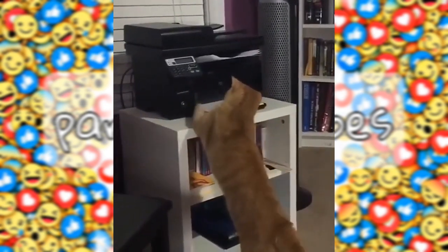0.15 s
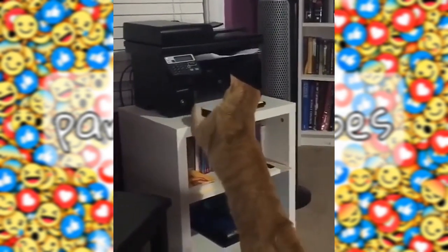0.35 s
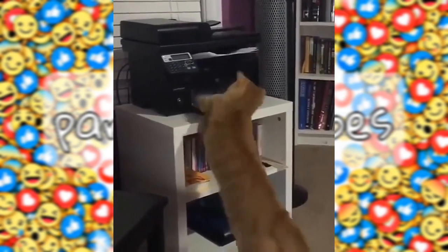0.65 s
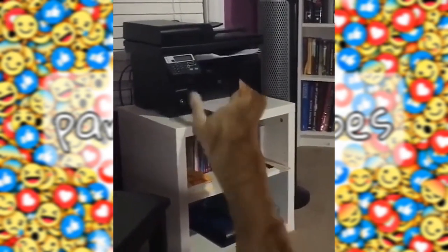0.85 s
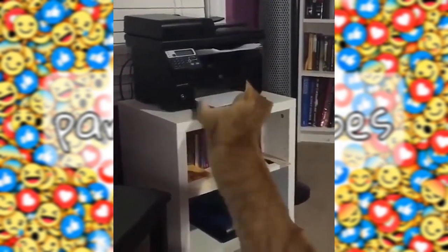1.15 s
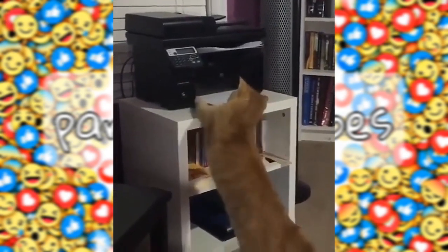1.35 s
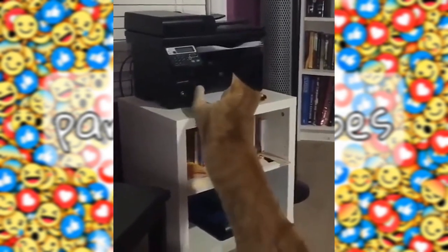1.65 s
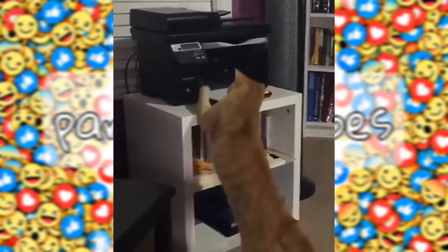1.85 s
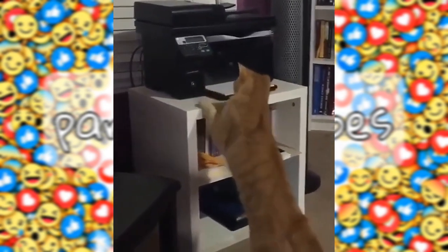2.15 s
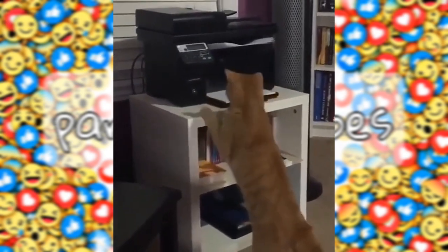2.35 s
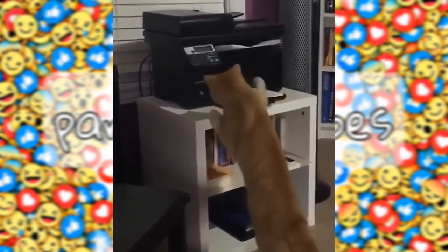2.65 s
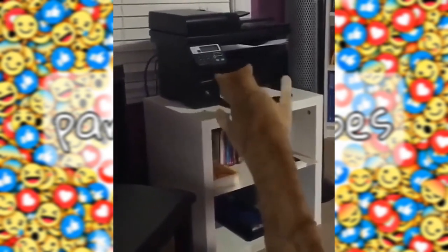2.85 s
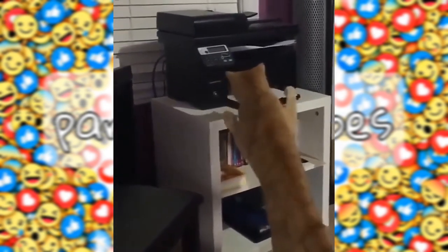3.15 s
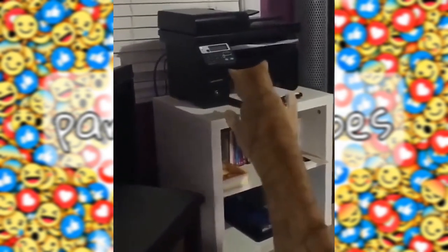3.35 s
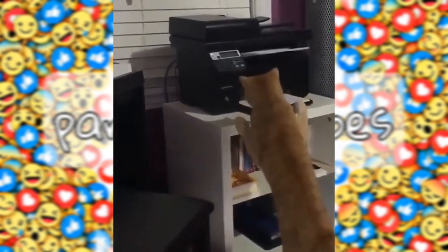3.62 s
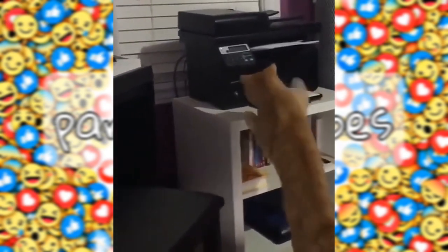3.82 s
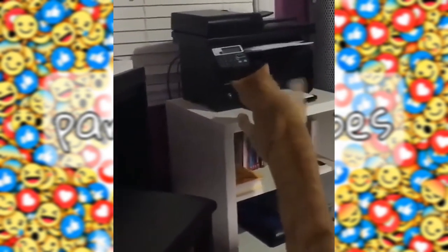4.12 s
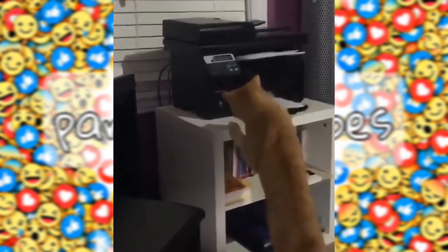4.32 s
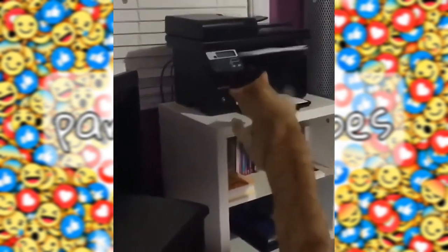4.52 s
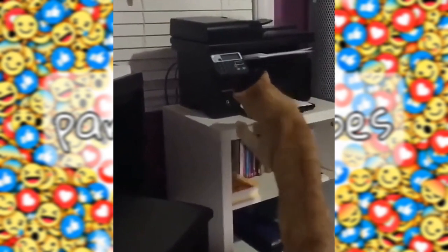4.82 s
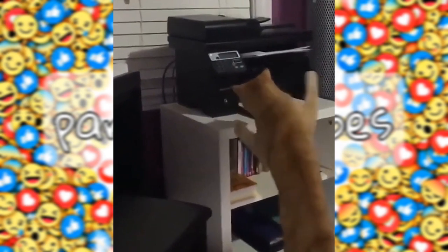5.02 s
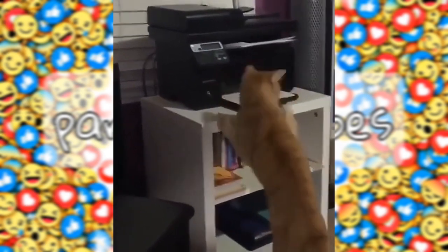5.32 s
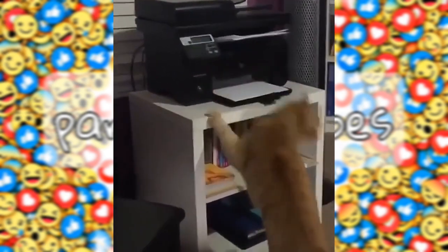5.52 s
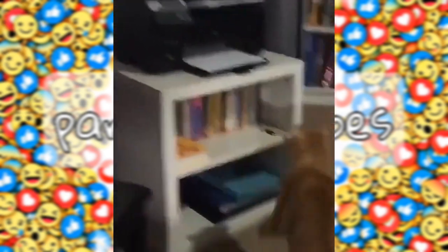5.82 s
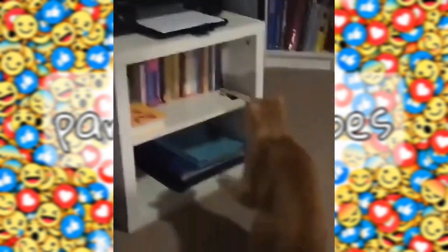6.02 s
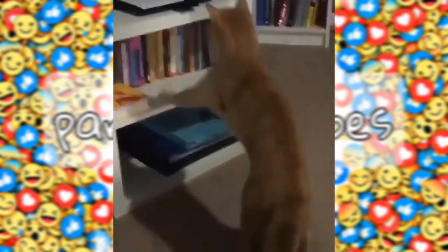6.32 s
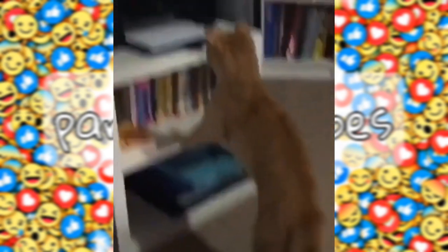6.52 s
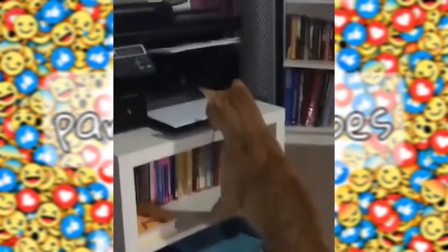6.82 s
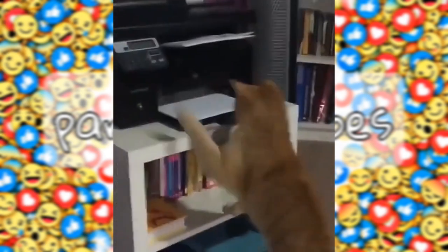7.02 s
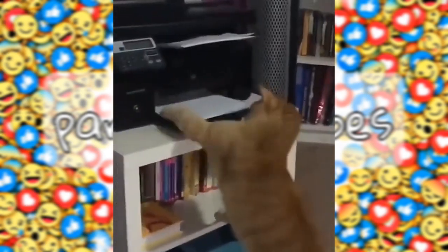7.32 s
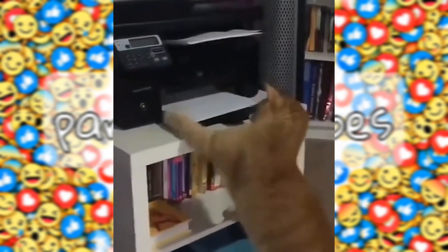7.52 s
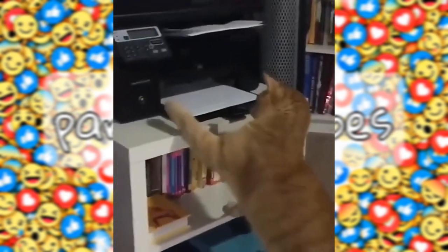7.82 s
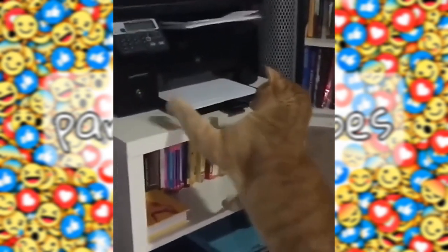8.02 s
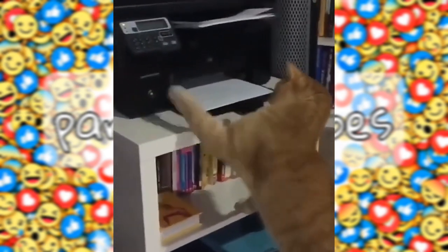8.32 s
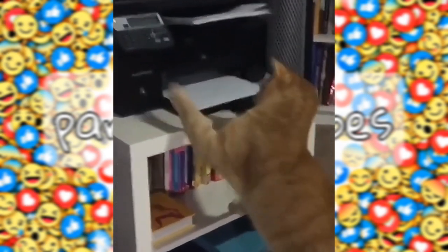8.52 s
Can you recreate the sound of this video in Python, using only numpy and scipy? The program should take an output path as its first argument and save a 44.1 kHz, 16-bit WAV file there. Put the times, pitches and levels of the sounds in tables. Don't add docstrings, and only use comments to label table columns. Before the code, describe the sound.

In a small quiet room, a phone about two metres away picks up a cat batting a printer tray. Short rattling plastic knocks ring the casing and boom in the hollow shelf, mixed with padded thuds and paper scuffs. Blows come in uneven clusters, pause mid-way, then return harder and more papery. A low fan hum and faint hiss continue underneath.

```python
import sys
import numpy as np
from scipy import signal
from scipy.fft import rfft, irfft, next_fast_len
from scipy.io import wavfile
from scipy.ndimage import uniform_filter1d

SR = 44100
rng = np.random.default_rng(int(sys.argv[2]) if len(sys.argv) > 2 else 0)


def wav_out(sig):
    wavfile.write(sys.argv[1], SR, np.round(np.clip(np.atleast_2d(sig).T, -1, 1) * 32767).astype(np.int16))


def magnitude_from_level(level_db):
    exponent = np.asarray(level_db, float) / 20
    return 10 ** exponent


N = 381899
LOW_HZ, HIGH_HZ = 520, 3800


def unit(x):
    return x / np.sqrt(np.mean(x ** 2))


def shape(x, gain):
    size = next_fast_len(len(x) + SR)
    f_hz = np.arange(size // 2 + 1) * SR / size + 1
    return irfft(rfft(x, size) * gain(f_hz), size)[:len(x)]


def colour(points):
    hz, db = np.transpose(points)
    return lambda f: magnitude_from_level(np.interp(np.log(f), np.log(hz), db))


def modes(table):
    def response(f):
        total = 0
        for k, (hz, width_hz, db) in enumerate(table):
            damping = 1j * f * width_hz
            total = total + (-1) ** k * magnitude_from_level(db) * damping / (hz ** 2 - f ** 2 + damping)
        return total
    return response


def split(x):
    low = signal.sosfilt(signal.butter(2, LOW_HZ, fs=SR, output="sos"), x)
    middle = signal.sosfilt(signal.butter(2, [LOW_HZ, HIGH_HZ], "band", fs=SR, output="sos"), x)
    high = signal.sosfilt(signal.butter(2, HIGH_HZ, "high", fs=SR, output="sos"), x)
    return low, -middle, high


def walk(rate_hz):
    k = int(SR / rate_hz)
    held = np.repeat(rng.standard_normal(N // k + 1), k)
    return uniform_filter1d(uniform_filter1d(held, k), k)[:N]


def patchy(x, spread_db, slow=9, wide=7):
    spec = signal.stft(x, nperseg=512)[2]
    field = uniform_filter1d(rng.standard_normal(spec.shape), slow, axis=1)
    field = uniform_filter1d(field, wide, axis=0)
    return signal.istft(spec * magnitude_from_level(spread_db * unit(field)), nperseg=512)[1][:N]


def swell(peak_s, db, rise_db_per_s, fade_db_per_s):
    age_s = np.arange(N) / SR - peak_s
    return magnitude_from_level(db + np.where(age_s < 0, rise_db_per_s, -fade_db_per_s) * age_s)


def fan():
    # [f/Hz, density/dB per Hz]
    air_colour = [(18, -71), (30, -14), (174, -24), (203, 4), (285, -13), (308, 1), (341, -15.5),
                  (543, -12.5), (722, -14.5), (780, -9), (843, -14), (1700, -13.5), (7600, -38.5),
                  (13400, -39.5), (14500, -80)]
    # [f/Hz, width/Hz, level/dB]
    hum = [(125.6, 21, -5.5), (214.6, 7.2, -5.5), (261, 15, -1), (301, 3.4, -12.5), (1255, 120, -16.5),
           (1560, 68, -10.5), (1725, 125, -18.5), (2750, 170, -35)]
    # [f/Hz, level/dB]
    motor = [(769.8, -70), (1130, -76.5), (1540, -76.5), (1755, -73.5), (3079, -83)]
    hum_db, hiss_db, rustle_db = -63, -63.5, -73
    fur = swell(peak_s=6.458, db=-66.5, rise_db_per_s=10, fade_db_per_s=50)
    levels = magnitude_from_level(hum_db), magnitude_from_level(hiss_db), np.hypot(magnitude_from_level(rustle_db), fur)
    air = shape(rng.standard_normal(N), colour(air_colour))
    resonance = shape(rng.standard_normal(N), modes(hum))
    duct = unit(air) + magnitude_from_level(-4.5) * unit(resonance)
    out = 0
    for part, gain, flicker_db in zip(split(patchy(duct, 2.4, slow=4)), levels, (2.0, 1.2, 1.3)):
        out = out + unit(part) * gain * magnitude_from_level(flicker_db * walk(12))
    for hz, db in motor:
        gain = np.sqrt(2) * magnitude_from_level(db + 1.0 * walk(18))
        wavering_hz = hz * (1 + 0.00195 * walk(4.4))
        out = out + gain * np.sin(2 * np.pi * np.cumsum(wavering_hz) / SR)
    return out


def blows():
    # [t/s, peak/dB, paper slap/dB re casing, struck panel f/Hz]
    drops = [(0.001, -16.5, -9.5, 980), (1.002, -30.5, 5, 1350), (1.395, -18.5, 2, 1640),
             (1.426, -22.5, -6, 1970), (1.629, -26.5, -0.5, 2170), (1.999, -30, -18, 2000),
             (2.988, -26.5, -11, 1030), (3.975, -32, -6.5, 1640), (4.803, -21.5, -3, 1370),
             (7.145, -30.5, -5.5, 1650), (7.748, -13.5, 1, 1880), (8.636, -14.5, -3.5, 2100)]
    # [s, dB, dB, Hz]
    bats = [(0.02, -17, -11.5, 2750), (0.756, -30.5, -9.5, 1030), (0.853, -14, -11.5, 1600),
            (1.131, -18.5, -1, 1740), (1.159, -8.5, -13, 2750), (1.93, -24.5, -16, 1020),
            (1.96, -24, -18, 1650), (2.967, -24.5, -8, 1050), (3.436, -29, -16, 1430),
            (4.516, -9.5, -17.5, 1160), (4.533, -13.5, -6, 980), (4.782, -10.5, -19.5, 1560),
            (5.09, -12, -13.5, 1270), (6.921, -33.5, -5, 2050), (7.41, -15, -11.5, 1330),
            (8.418, -13.5, -7.5, 1340), (8.443, -18.5, -11, 1330), (7.526, -12, -2, 1370)]
    # [s, dB, dB, Hz]
    clacks = [(0.233, -18.5, -14, 1920), (0.875, -11, -12.5, 1250), (1.198, -16.5, -8, 1360),
              (4.097, -8, -8.5, 2060), (4.281, -4.5, -11, 1910), (4.506, -18, -13, 2190),
              (5.073, -9.5, -11.5, 2000), (6.573, -29.5, -9, 1370), (7.065, -25, -9.5, 1420),
              (7.347, -6.5, -2.5, 2170), (7.568, -11.5, -9.5, 1410)]
    # [s, dB, dB, Hz]
    swipes = [
        (0.532, -29, -13.5, 1570),
        (1.358, -10.5, -17, 1150),
        (1.584, -15.5, -19, 1310),
        (4.085, -20, -17, 2080),
        (4.772, -28, -9, 2330),
        (7.339, -14, -4, 2570),
        (3.752, -32, -10, 2200),
        (7.508, -15.5, -8, 1520),
        (7.733, -13.5, -9.5, 1900),
        (8.617, -13.5, -14, 885),
    ]
    # [t/s, peak/dB, shelf thump/dB re casing, struck panel f/Hz]
    thuds = [(0.549, -18.5, -43, 630), (0.681, -25, -12, 853), (3.767, -17.5, -40, 1600),
             (3.84, -25.5, -19, 945), (4.107, -10.5, -15.5, 1500), (4.293, -15, -16.5, 1350),
             (6.788, -31.5, -10.5, 1500), (6.938, -17.5, -32, 623), (7.284, -37, -26, 1300),
             (7.355, -8.5, -7.5, 1250), (0.387, -40, -30, 1030), (3.614, -41, -5, 1090),
             (3.915, -33.5, -2, 1500), (6.624, -27.5, -14, 1300)]
    # (table, rattle length s, shelf dB re casing)
    kinds = (swipes, 0.044, -20.5), (bats, 0.027, -14), (clacks, 0.018, -14), (drops, 0.018, -7.5)
    rows = []
    for table, length_s, shelf_db in kinds:
        for s, db, paper_db, panel_hz in table:
            rows.append((s, db, shelf_db, paper_db, length_s, panel_hz))
    thud_s, thud_paper_db = 0.014, -41
    for s, db, shelf_db, panel_hz in thuds:
        rows.append((s, db, shelf_db, thud_paper_db, thud_s, panel_hz))
    return sorted(rows)


def rattle(scatter_db=1.0, density=0.05, rise=0.066, panel_q=7.5, panel_db=9.5, contact_s=0.0043, size=8000):
    trains, t = np.zeros((3, N + size)), np.arange(size) / SR
    for s, db, shelf_db, paper_db, length_s, panel_hz in blows():
        chance = rng.random((3, size))
        strength = magnitude_from_level(-scatter_db * np.log(chance[2] + 0.0074))
        knocks = (chance[0] < density) * np.sign(chance[1] - 0.5) * strength
        knocks[0] = magnitude_from_level(17.0)
        age = t / length_s
        knocks *= np.exp(-age ** 2) * (1.1 - np.exp(-age / rise))
        knocks *= np.sqrt(length_s * SR / np.sum(knocks ** 2))
        push = 0.95 * knocks
        push[0] += np.sqrt(length_s * SR)
        touch = knocks * np.exp(-t / contact_s)
        ring = signal.lfilter(*signal.iirpeak(panel_hz, panel_q, fs=SR), touch)
        clack = knocks + magnitude_from_level(panel_db) * ring
        i = max(int(s * SR), 0)
        gains = magnitude_from_level(db + np.array([[shelf_db], [0], [paper_db]]))
        trains[:, i:i + size] += gains * np.array([push, clack, knocks])
    return trains[:, :N]


def printer_blows():
    # [f/Hz, density/dB per Hz]
    knock = [(24, -55), (40, 1), (97, -21.5), (194, -5), (288, -8.5), (350, -4.5), (560, -12), (1360, -8),
             (1500, -9), (2070, -11.5), (2400, -17.5), (13100, -31.5), (14500, -30)]
    # [f/Hz, width/Hz, level/dB]
    shelf_modes = [(133, 13, -11.5), (214.4, 8.3, 5.5), (252, 76, -17), (301.3, 6.3, 9), (346.5, 47, 3),
                   (423, 37, 9), (430, 10, -5)]
    # [f/Hz, width/Hz, level/dB]
    casing_modes = [(636, 30, -4), (857, 73, -17), (939, 108, -2.5), (1124, 41, -2), (1370, 56, -6),
                    (1600, 8, -35), (2000, 290, -13), (2230, 37, -9), (2550, 710, -4.5), (2750, 27, -39),
                    (2950, 140, -31)]
    shelf, casing, paper = (shape(train, colour(knock)) for train in rattle())
    boom = split(magnitude_from_level(2.5) * shelf + shape(shelf, modes(shelf_modes)))[0]
    ring = split(magnitude_from_level(-2.0) * casing + shape(casing, modes(casing_modes)))[1]
    crack = split(paper)[2]
    delay_s = 0.00708
    return magnitude_from_level(4.5) * np.roll(boom, int(delay_s * SR)) + magnitude_from_level(-2.0) * ring + magnitude_from_level(11.5) * crack


def scuffs(density=0.03, scatter_db=4.5):
    # [peak t/s, level/dB, fade/dB per s, fine crackle/dB re level]
    drags = [(0.298, -59, 254, -16), (0.4, -52.5, 450, -46), (0.55, -45, 73, -28), (0.682, -46.5, 40, -23),
             (0.984, -45, 36, -8.5), (2.284, -49.5, 250, -20), (3.615, -50, 600, -30),
             (3.78, -45, 120, -28), (3.912, -40, 125, -15.5), (6.578, -47, 115, -22),
             (6.792, -48, 430, -37), (6.95, -39.5, 117, -24), (7.077, -40.5, 113, -9),
             (7.284, -46, 108, -22), (7.93, -64, 66, -9), (7.978, -55, 106, -4), (8.185, -52, 95, -13)]
    # [f/Hz, density/dB per Hz]
    scuff_colour = [(59, -42), (100, -16), (172, 1.5), (314, 2), (421, -7.5), (599, 0.5), (1410, -1),
                    (6850, -28), (13300, -30.5), (14500, -39)]
    rise_db_per_s, first_bite_db, bite_s = 703, 7, 0.018
    t = np.arange(N) / SR
    grains = (rng.random(N) < density) * rng.standard_normal(N) * magnitude_from_level(scatter_db * walk(60))
    grains /= np.sqrt(uniform_filter1d(grains ** 2, size=SR // 30) + 1e-9)
    low, middle, high = split(patchy(shape(grains, colour(scuff_colour)), 1.56))
    body, crackle = unit(low + middle), unit(high)
    out = 0
    for s, db, fade_db_per_s, crackle_db in drags:
        bite_db = first_bite_db * np.exp(-np.maximum(t - s, 0) / bite_s)
        grit = body + magnitude_from_level(crackle_db + bite_db) * crackle
        out = out + swell(s, db - 6.0, rise_db_per_s, fade_db_per_s) * grit
    return out


def spring():
    # [t/s, level/dB]
    pings = [
        (.758, -65),
        (3.980, -62.5),
        (7.151, -63),
    ]
    # [f/Hz, width/Hz, level/dB]
    steel = [(8770, 130, 5.5), (11900, 170, 2), (13000, 200, -1)]
    ticks = np.zeros(N)
    for s, db in pings:
        ticks[int(s * SR)] = magnitude_from_level(db + 48.0)
    return shape(ticks, modes(steel))


def room(x, wet_db=-4.5, build_s=0.0077):
    # [f/Hz, t60/s]
    decay = [(150, 0.27), (600, 0.31), (2000, 0.34), (5000, 0.33), (12000, 0.27)]
    hz, t60_s = np.transpose(decay)
    t = np.arange(SR // 2) / SR
    a, b = 2 * np.pi * np.outer((1.7, 2.9), np.arange(N) / SR)
    shares = np.cos(a) * np.cos(b), np.cos(a) * np.sin(b), np.sin(a) * np.cos(b), np.sin(a) * np.sin(b)
    out = x
    for share in shares:
        tail = 0
        for centre_hz in 45 * 2.0 ** np.arange(9):
            octave = lambda f: np.maximum(1 - np.abs(np.log2(f / centre_hz)), 0) ** 0.5
            band = shape(rng.standard_normal(len(t)), octave)
            band_t60_s = np.interp(np.log(centre_hz), np.log(hz), t60_s)
            tail = tail + band * 1000.0 ** (-t / band_t60_s)
        tail = tail * (1 - np.exp(-t / build_s))
        tail = tail / np.sqrt(np.sum(tail ** 2))
        out = out + magnitude_from_level(wet_db) * signal.fftconvolve(share * x, tail)[:N]
    return out


def scene():
    knocks = signal.sosfilt(signal.butter(4, 75, "high", fs=SR, output="sos"), printer_blows())
    return (room(knocks + scuffs() + spring()) + fan())[None]


def low_pass(x):
    return signal.sosfilt(signal.butter(12, 15010, fs=SR, output="sos"), x)


def record(dry):
    top_hz, trace_db = 14050, -30.5
    kept = signal.sosfilt(signal.ellip(10, 0.3, 60, top_hz, fs=SR, output="sos"), dry)
    return low_pass(kept + magnitude_from_level(trace_db) * dry)


dry = scene()
out = record(dry)
wav_out(out)
```